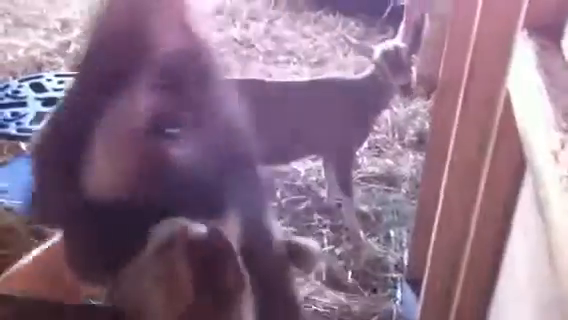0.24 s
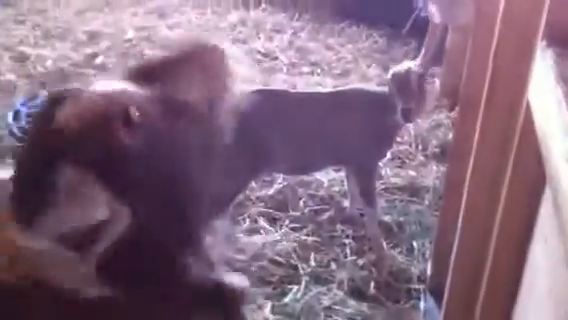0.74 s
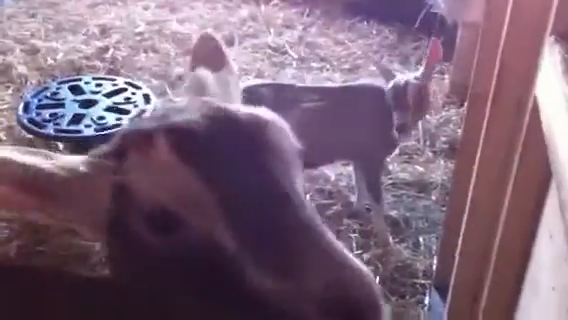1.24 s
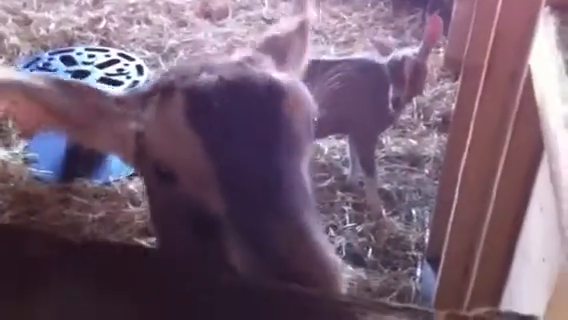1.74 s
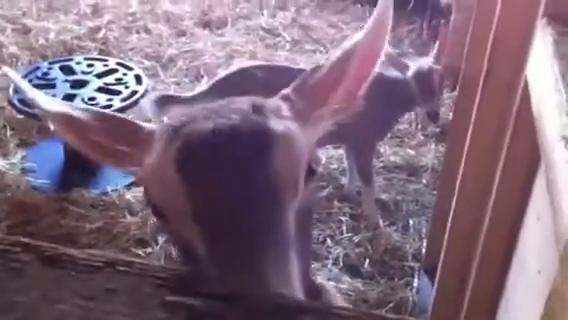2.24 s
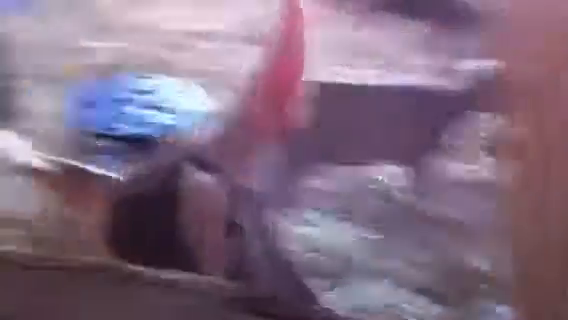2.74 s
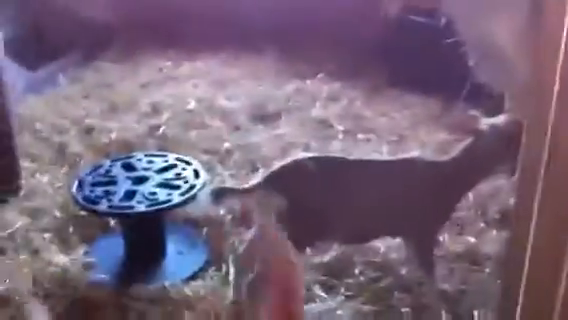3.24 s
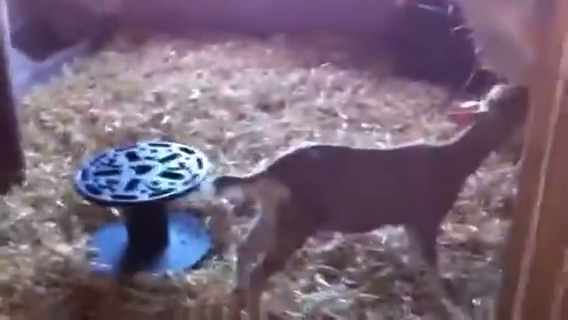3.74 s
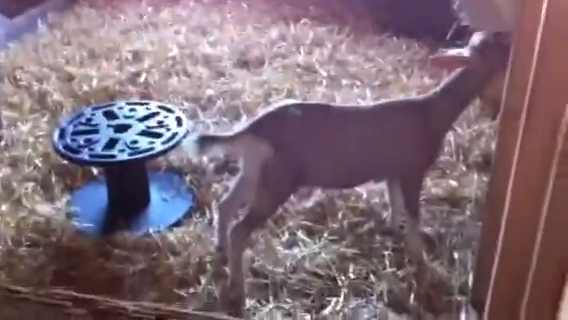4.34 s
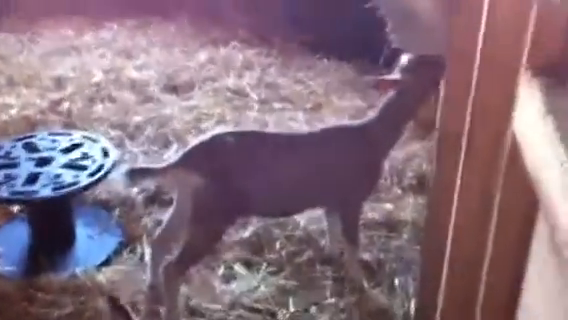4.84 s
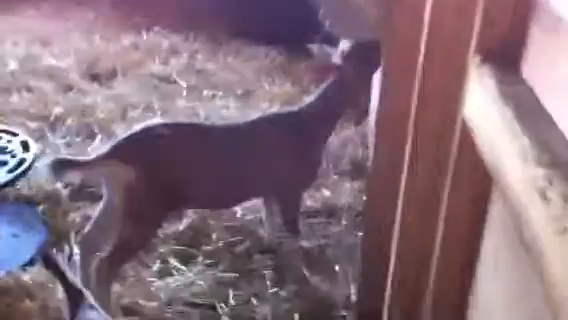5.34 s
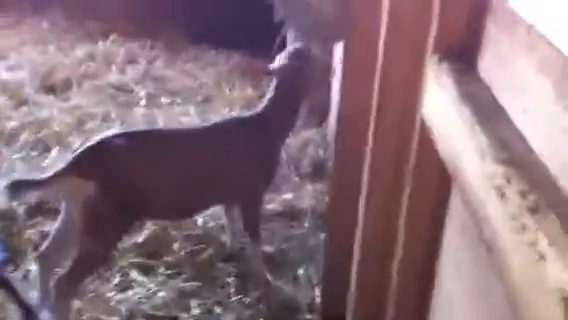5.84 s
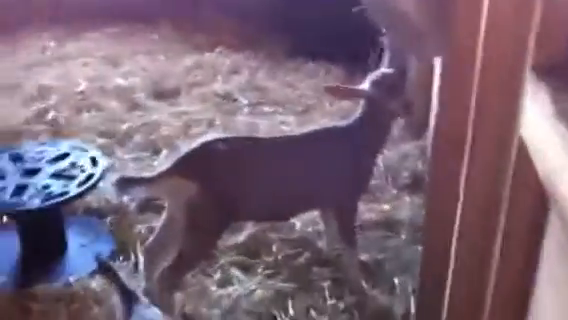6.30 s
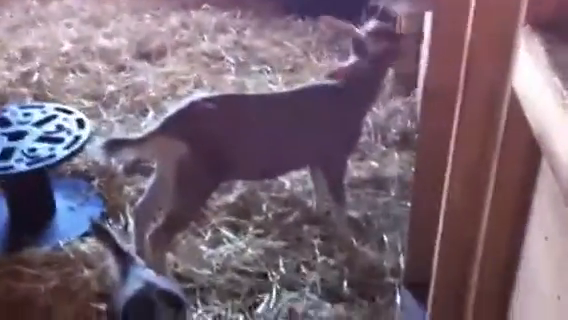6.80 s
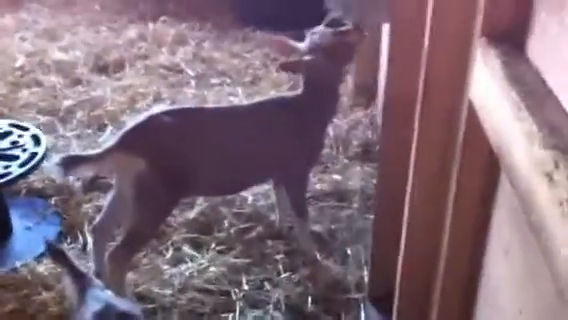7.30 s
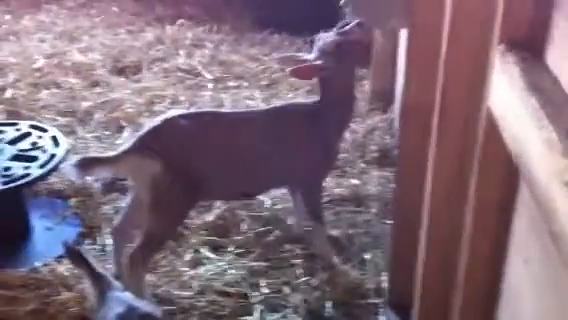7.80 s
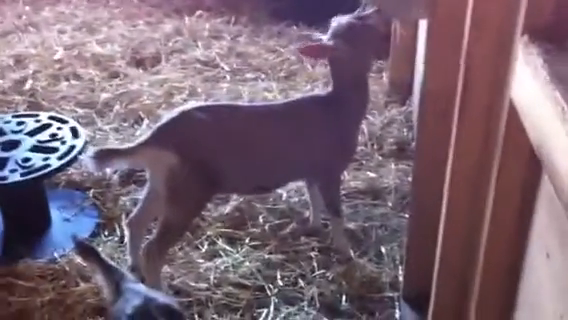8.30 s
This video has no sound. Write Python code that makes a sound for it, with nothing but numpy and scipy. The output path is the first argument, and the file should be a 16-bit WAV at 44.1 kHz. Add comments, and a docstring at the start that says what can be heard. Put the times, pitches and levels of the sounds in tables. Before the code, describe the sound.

Close to a small microphone in a straw-bedded barn pen, coarse hair rasps over a wooden rail in several gritty, hissing strokes, the longest one ringing the wood. A dull knock falls between them. After faint straw rustling, a kid gives one trembling bleat that opens from a hum, then a short, soft, closed-mouth throbbing call. A sharp board knock and a quick jerky wooden scrape end it, with brief hollow room echo.

```python
"""In a straw pen a young goat rubs its head along a wooden rail close by: gritty noise through resonances.
The kid gives one long quavering bleat that opens from a hum, then three soft throbs with its mouth nearly
shut; its voice is a stack of harmonics mixed with puffs of air. Boards knock and straw ticks, as short
bursts of noise, and something scrapes in jerks over the wood. The small barn rings briefly."""
import sys
import numpy as np
from scipy import signal
from scipy.fft import rfft, irfft, next_fast_len
from scipy.io import wavfile
from scipy.ndimage import uniform_filter1d

SR = 44100
rng = np.random.default_rng(int(sys.argv[2]) if len(sys.argv) > 2 else 0)


def put_to_file(sound):
    """Save the sound as 16-bit audio at rate SR, in the file named by the first command-line argument."""
    columns = np.atleast_2d(sound).T  # one column per channel
    safe = np.clip(columns, -1, 1)
    whole_steps = np.round(safe * 32767)
    wavfile.write(sys.argv[1], SR, whole_steps.astype(np.int16))


N = 377496
TIME = np.arange(N) / SR
WAVER_HZ = 8.9  # how fast the rail's resonances and the thin ring waver


def amp(db):
    """Turns decibels into a gain."""
    return 10 ** (np.asarray(db) / 20)


def unit(x):
    """Scales a sound to rms 1."""
    return x / np.sqrt(np.mean(x ** 2) + 1e-20)


def decay(t, t60):
    """Exponential fall by 60 dB in t60 seconds."""
    return np.exp(-np.log(1000) * t / t60)


def read(points, hz, column=1):
    """Reads between the points of a table on a log-frequency axis."""
    table = np.array(points, float)
    return np.interp(np.log(hz + 1), np.log(table[:, 0] + 1), table[:, column])


def shape(x, gain):
    """Filters a sound by a gain that depends on frequency."""
    size = next_fast_len(len(x) + 2048)
    hz = np.fft.rfftfreq(size, 1 / SR)
    return irfft(rfft(x, size) * gain(hz), size)[:len(x)]


def colour(x, points, column=1):
    """Filters a sound by the dB curve of a table, then scales it to rms 1."""
    return unit(shape(x, lambda hz: amp(read(points, hz, column))))


def wander(length, rate_hz):
    """Slow random movement of rms 1: noise with the fast changes filtered out."""
    return unit(shape(rng.standard_normal(length), lambda hz: 1 / (1 + (hz / rate_hz) ** 4)))


def band(length, centre_hz, width_hz):
    """A narrow band of noise at rms 1, like a cluster of close modes."""
    def gain(hz):
        return 1 / (1 + ((hz - centre_hz ** 2 / (hz + 1)) / width_hz) ** 4)
    return unit(shape(rng.standard_normal(length), gain))


def resonate(x, hz, width):
    """A resonance of gain 1 whose frequency follows the curve hz."""
    turn = np.exp(2j * np.pi * np.cumsum(hz * np.ones(len(x))) / SR)
    r = np.exp(-np.pi * width / SR)
    # shift the resonance down to 0 Hz, smooth there, and shift back
    return 2 * (turn * signal.lfilter([1 - r], [1, -r], x / turn)).real


def add(mix, s, sound):
    """Mixes a sound in from time s."""
    part = mix[max(round(s * SR), 0):][:len(sound)]
    part += sound[:len(part)]


def burst(noise, t60, rise=0.00052):
    """Gives a sound a quick rise and an exponential fall."""
    t = np.arange(len(noise)) / SR
    return noise * (1 - np.exp(-t / rise)) * decay(t, t60)


def grains(per_s, spread_db):
    """Friction as tiny slips of uneven size over a fine hiss."""
    sizes = amp(spread_db * np.minimum(rng.exponential(1, N), 4))
    slips = (rng.random(N) < per_s / SR) * rng.standard_normal(N) * sizes
    return unit(slips) + 1.11 * rng.standard_normal(N)


def patchy(x):
    """Shifts the colour at random, in patches narrow in frequency and brief in time."""
    patch_db = 3.5  # typical (rms) depth
    z = signal.stft(x, SR, nperseg=1024)[2]
    patches = uniform_filter1d(rng.standard_normal(z.shape), size=4, axis=0)
    patches = uniform_filter1d(patches, size=9, axis=1)
    return signal.istft(z * amp(patch_db * unit(patches)), SR, nperseg=1024)[1][:len(x)]


def pressure(start, swell_s, ease_s, swell_db, release_db_per_s=163):
    """Gain of one stroke: quick contact, a swell to the crest, a slow easing, then the release."""
    attack_s, ease_db_per_s = 0.016, 44.5
    t = np.maximum(TIME - start, 0)
    db = -swell_db * np.maximum(1 - t / swell_s, 0)
    db -= ease_db_per_s * np.clip(t - swell_s, 0, ease_s)
    db -= release_db_per_s * np.maximum(t - swell_s - ease_s, 0)
    return np.minimum(t / attack_s, 1) * amp(db)


def still_air():
    """Faint steady noise of the air, its level drifting slowly."""
    # spectrum of the air: (frequency [Hz], level [dB])
    air_colour = [(40, -24), (170, 2), (360, 0.5), (700, -6), (16000, -16)]
    return amp(-63.5) * colour(rng.standard_normal(N), air_colour) * amp(1.7 * wander(N, 0.97))


def bedding():
    """Straw slips as grains when shuffled or brushed; ticks and small bumps are short noise bursts."""
    # soft shuffles: (middle [s], level [dB], time from the middle to half gain [s])
    shuffles = [(0, -54, 0.089), (0.4, -59, 0.025), (1.052, -56.5, .12), (6.308, -58.5, 0.056),
                (6.593, -62, 0.11), (7.31, -60, 0.15)]
    # spectrum of the shuffles: (frequency [Hz], level [dB])
    shuffle_colour = [(70, -22), (200, 1.5), (500, -2), (750, -8.5), (2200, -7.5), (4400, -14)]
    # light brushing: (start [s], swell time [s], easing time [s], crest [dB], depth of the swell [dB])
    brushes = [(4.062, 0.013, 0.065, -55.5, 9), (4.377, 0.895, 0.054, -51, 9)]
    # spectrum of the brushing: (frequency [Hz], level [dB])
    brush_colour = [(300, -16), (2200, 0), (3400, -3.5), (5000, -1), (9000, 3), (16000, -4)]
    # ticks and bumps: (time [s], level [dB], t60 [s], centre frequency [Hz])
    ticks = [(2.811, -47, 0.34, 990), (2.96, -38.5, 0.042, 1910), (5.964, -41, 0.012, 1370),
             (6.535, -52, .08, 393), (6.798, -35, 0.036, 11800), (7.46, -49, 0.054, 2200)]
    shuffling = sum(amp(db) / (1 + ((TIME - s) / half) ** 4) for s, db, half in shuffles)
    out = colour(grains(2000, 0.55), shuffle_colour) * shuffling
    brushing = sum(amp(db) * pressure(start, swell_s, ease_s, swell_db)
                   for start, swell_s, ease_s, db, swell_db in brushes)
    out += colour(grains(3000, 0.89), brush_colour) * brushing
    for s, db, t60, centre_hz in ticks:
        snap = shape(rng.standard_normal(SR // 4),
                     lambda hz: 1 / np.hypot(1, hz / centre_hz - centre_hz / (hz + 1)))
        add(out, s, amp(db) * burst(unit(snap), t60))
    return out


def rail(x, pitch, ring_db):
    """The rail's resonances slide down and waver as the point of contact moves; overall level is kept."""
    # resonances before the stroke's factors: (frequency [Hz], width [Hz], level against the rasp [dB])
    resonances = [(1680, 260, -6), (2100, 59, -8.5), (2294, 150, -0.5), (3070, 150, -5), (3350, 89, -3)]
    slide_per_s, slide_centre_s = 0.27, 0.18  # rate of the fall; time when the pitch factor is exact
    waver = 0.036  # share of each resonance's frequency
    t = np.arange(len(x)) / SR
    slide = pitch * np.exp(slide_per_s * (slide_centre_s - t))
    ringing = 0
    for hz, width, db in resonances:
        path_hz = hz * slide * (1 + waver * wander(len(x), WAVER_HZ))
        ringing = ringing + amp(db + ring_db) * resonate(x, path_hz, width)
    return unit(x + ringing) * np.std(x)


def rubbing():
    """Coarse hair slips over the rail: one pressure drives a rasp and a hiss in its resonances and a push."""
    # rubbing strokes: (start [s], swell time [s], easing time [s], crest [dB], depth of the swell [dB],
    # then against the rasp: hiss [dB], fine hiss [dB], push [dB];
    # then the rail's resonances: pitch [factor], strength [dB])
    strokes = [(0.411, 0.14, 0.11, -34, 14, -0.5, -7, -12.5, 0.97, 2),
               (1.471, 0.26, 0.17, -30.5, 7, 2.5, -5, -8.5, 0.98, 7.5),
               (2.705, 0.038, 0.085, -59, 9.5, -2, -1.5, -2, .8, -16),
               (2.84, 0.067, 0.052, -49.5, 16, -13, -32, -5, 0.94, -22),
               (3.078, 0.15, 0.083, -46.5, 13.5, -9.5, -15.5, -5, 0.72, -19),
               (3.362, 0.14, 0.12, -35.5, 6, 2, -0.5, -15.5, 0.974, 2.5)]
    # spectra of the rasp, the dull push and the hiss of the hair: (frequency [Hz], level [dB])
    rasp_colour = [(450, -25), (700, 1), (1150, 3), (1600, 3.5), (2400, 4.5), (2750, -3.5), (3800, -24)]
    push_colour = [(70, -44), (110, -28), (150, -5), (340, 3), (540, -1.5), (1000, -20)]
    hiss_colour = [(2100, -26), (2900, 0.5), (4400, 2.5), (5200, -2), (8500, -2), (12000, -9), (16000, -22)]
    lean_db_per_s = 59  # the push grows as the head leans in
    contact_db, contact_t60_s = 9, 0.29  # extra push for a moment at first contact
    fine_above_hz = 6300
    fine_lead_s, fine_release_db_per_s = 0.0036, 223  # the finest hiss crests and stops first
    rasp = colour(patchy(grains(5000, 2.5)), rasp_colour)
    push = colour(grains(600, 1.0), push_colour)
    hair = colour(patchy(grains(9000, 2.2)), hiss_colour)
    hiss = shape(hair, lambda hz: 1 / (1 + (hz / fine_above_hz) ** 10))
    hiss, fine = unit(hiss), unit(hair - hiss)
    out = np.zeros(N)
    for start, swell_s, ease_s, db, swell_db, hiss_db, fine_db, push_db, pitch, ring_db in strokes:
        first = round(start * SR)
        span = slice(first, first + SR)
        t = np.clip(TIME[span] - start, 0, swell_s + ease_s)
        lean = amp(lean_db_per_s * (t - swell_s)) + amp(contact_db) * decay(t, contact_t60_s)
        body = rail(rasp[span] + amp(hiss_db) * hiss[span], pitch, ring_db)
        body += amp(push_db) * lean * push[span]
        add(out, start, amp(db) * pressure(start, swell_s, ease_s, swell_db)[span] * body)
        fine_press = pressure(start, swell_s - fine_lead_s, ease_s, swell_db, fine_release_db_per_s)
        out += amp(db + fine_db) * fine_press * fine
    return out * amp(0.86 * wander(N, 36))


def knocks():
    """Blows ring a board's crowded, damped modes over a low thud; longer boards are lower, soft blows duller."""
    # blows: (time [s], level [dB], t60 [s], dulled above [Hz], pitch of the board [factor], thud [dB])
    blows = [(0.792, -26, 0.059, 2440, 0.688, -38), (7.537, -20, 0.077, 3250, 0.99, -59)]
    # spectrum of the board before the pitch factor: (frequency [Hz], level [dB])
    board_colour = [(80, -51.5), (300, -17.5), (520, -5), (1000, -3), (1350, 3.5), (1700, 1), (2350, 2),
                    (3000, -4.5), (16000, -19.5)]
    # lasting modes before the pitch factor: (frequency [Hz], level against the blow [dB], t60 [s])
    modes = [(735, -19.5, 0.15), (1280, -19, 0.47), (1370, -19, 0.31), (2080, -5.5, 0.11)]
    mode_width = 0.16  # share of the listed frequency
    # spectrum of the thud: (frequency [Hz], level [dB])
    thud_colour = [(50, -27), (130, -3), (470, 4), (700, -25.5)]
    out = np.zeros(N)
    for s, db, t60, dull_hz, pitch, thud_db in blows:
        wood = shape(rng.standard_normal(SR // 4),
                     lambda hz: amp(read(board_colour, hz / pitch)) / np.hypot(1, (hz / dull_hz) ** 2))
        add(out, s, amp(db) * burst(unit(wood), t60, rise=0.00097))
        thud = colour(rng.standard_normal(SR), thud_colour)
        add(out, s, amp(thud_db) * burst(thud, t60=0.34, rise=0.0014))
        for mode_hz, mode_db, mode_t60 in modes:
            mode = band(SR, mode_hz * pitch, mode_width * mode_hz)
            add(out, s, amp(db + mode_db) * burst(mode, mode_t60))
    return out


def rail_rings():
    """Rings of the wood build and die away late in some strokes; a thin high ring lingers."""
    # rings: (crest [s], level [dB], centre frequency [Hz], width [Hz])
    rings = [(1.81, -36, 315, 130), (1.85, -41, 160.6, 36), (1.885, -35.5, 362, 280),
             (3.261, -52, 165, 39.6), (3.595, -41, 268, 75), (3.68, -46, 3160, 220)]
    # thin ring that outlasts the hardest stroke: (frequency [Hz], level [dB], t60 [s])
    thin_ring = [(3662, -63, 1.42), (4554, -47.5, 1.075)]
    rise_db_per_s, ring_t60_s = 120, 0.38
    thin_ring_s = 1.824  # start time
    out = np.zeros(N)
    for s, db, centre_hz, width_hz in rings:
        rise = amp(-rise_db_per_s * np.maximum(s - TIME, 0))
        fall = decay(np.maximum(TIME - s, 0), ring_t60_s)
        out += amp(db) * rise * fall * band(N, centre_hz, width_hz)
    for hz, db, t60 in thin_ring:
        tone = unit(np.sin(2 * np.pi * hz * TIME[:SR])) * amp(2 * wander(SR, WAVER_HZ))
        add(out, thin_ring_s, amp(db) * burst(tone, t60))
    return out


def bleat(controls, start, end, sag, dip_db, dip_rough, flatness, first_dip):
    """Vocal pulses quaver: between throbs the pitch sags, the level drops and the voice turns hoarse."""
    # throat spectrum: (frequency [Hz], mouth shut [dB], mouth half open [dB], mouth open [dB])
    throat = [(108, -32, -23, -44), (247, 6.5, 8, -23), (494, -13.5, -14, -4.5), (740, -16, 3.5, 1),
              (1080, -17.5, -3, -6), (1340, -19, -11, -14), (1750, -21, -15.5, -9), (2180, -25, -21, -11.5),
              (2800, -25.5, -16.5, -15), (3700, -31, -36, -17.5), (4240, -23.5, -18.5, -9),
              (7300, -26.5, -19, -16.5), (8550, -38, -26, -54)]
    mouth_db, mouth_width_hz = 4.5, 120  # the moving resonance, against the plain throat
    smear_rad = 1.3  # random spread of the harmonics' phases, which softens each vocal pulse
    hoarse_sag, hoarse_jitter = 0.16, 0.0594  # shares of the pitch: deeper sag, trembling
    t = np.arange(start, end, 1 / SR)
    s, *columns = np.transpose(controls)
    hz, db, mouth, quaver, mouth_hz, hoarse = (np.interp(t, s, c) for c in columns)

    beat = np.cumsum(quaver) / SR
    swing = abs(np.sin(np.pi * (beat - np.interp(s[0], t, beat))))  # 0 on a throb, 1 between two
    dip = swing ** flatness * np.where(t < s[0], first_dip, 1)
    jitter = (0.02 * dip + hoarse_jitter * hoarse) * wander(len(t), 150)
    sagging = 1 - (sag + hoarse_sag * hoarse) * swing ** 2
    turns = np.cumsum(hz * sagging * (1 + jitter)) / SR  # cycles of the vocal folds so far

    folds = sum(np.cos(2 * np.pi * k * turns + smear_rad * rng.standard_normal()) for k in range(1, 42))
    # hoarse pulses alternate strong and weak, which puts partials between the harmonics
    folds = folds * (1 + hoarse * (1 + dip) * wander(len(t), 40) * np.cos(np.pi * turns))
    # air rushes through once a cycle; it masks the upper harmonics and leaves the lowest clean
    puffs = rng.standard_normal(len(t)) * (1 + 0.26 * np.cos(2 * np.pi * turns))
    puffs = shape(puffs, lambda f: f / np.hypot(f, 1200))
    rough = np.clip(hoarse + dip_rough * dip, 0, 1)
    drive = (1 - rough) * unit(folds) + 1.5 * rough * unit(puffs)

    voice = np.zeros(len(t))
    for k in range(3):  # blend the throat from shut through half open to open
        share = np.maximum(1 - abs(np.clip(mouth, 0, 2) - k), 0)
        voice += share * colour(drive, throat, k + 1)
    voice = unit(voice + amp(mouth_db) * resonate(voice, mouth_hz, mouth_width_hz))
    fade = np.clip(np.minimum(t - start, end - t) / 0.01, 0, 1)
    return voice * amp(db - dip_db * dip) * fade


def kid():
    """The long bleat, then the short one, each steered by a table of controls for the throat."""
    # controls over each bleat: (time [s], pitch on a throb [Hz], level on a throb [dB],
    # mouth [0 shut, 1 half, 2 open], throbs [per s], moving resonance [Hz], hoarseness [0-1])
    long_controls = [(4.722, 298.7, -43.5, 0.24, 11.8, 1470, 0.15),
                     (4.815, 354, -39, 0.48, 9.8, 1460, 0.08), (5.02, 350.5, -37, 0.37, 9.5, 1500, 0.09),
                     (5.115, 365.4, -36.5, 1.25, 11.86, 1500, .05),
                     (5.288, 378, -39, 0.99, 12.04, 1660, .05),
                     (5.368, 358.6, -35.5, 1.73, 12.2, 1784, .15), (5.478, 350, -34, 1.8, 6.67, 1680, .14),
                     (5.62, 285.7, -40.5, 1.4, 6.93, 1460, 0.4)]
    short_controls = [(6.943, 253.6, -41.5, .12, 9.8, 1480, .14), (7.058, 300, -40.5, 0.16, 8, 1540, 0.073),
                      (7.17, 278.2, -37.5, 0.12, 9.4, 1130, .1)]
    # when each bleat sounds: (start [s], end [s])
    long_span, short_span = [(4.665, 5.68), (6.885, 7.208)]
    out = np.zeros(N)
    add(out, long_span[0], bleat(long_controls, *long_span, sag=0.12, dip_db=13, dip_rough=0.1,
                                 flatness=2.1, first_dip=0.44))
    add(out, short_span[0], bleat(short_controls, *short_span, sag=0.14, dip_db=16.0, dip_rough=0.23,
                                  flatness=1.5, first_dip=0.56))
    return out


def scrape():
    """Each jerk is a noise burst that mixes the hollow sound of wood with a high gritty squeal."""
    # jerks: (time [s], level [dB], t60 [s], share of wood against squeal [0-1])
    jerks = [(7.846, -41, 1, 0.37), (7.896, -27, 0.067, 0.15), (7.956, -34, 0.29, 0.86),
             (7.976, -34, 0.24, 1), (7.991, -24.5, 0.049, 0.76), (8.021, -36, 0.15, 1),
             (8.045, -25.5, 0.095, 0.57), (8.071, -22.5, 0.094, 0.95)]
    # spectra of the scrape: (frequency [Hz], wood [dB], squeal [dB])
    scrape_colour = [(101.4, -31, -13), (440, -8, 6), (544, 7.5, 0), (660, -21.5, 9), (1060, 1, -12),
                     (1440, 3, -5), (2630, -8, -4.5), (7900, -13.5, -5.5), (8900, -31, 5.5),
                     (12400, -14, 1), (16000, -24, -12)]
    out = np.zeros(N)
    for s, db, t60, share in jerks:
        grit = rng.standard_normal(SR // 3)
        share = np.clip(share, 0, 1)
        wood = colour(grit, scrape_colour, column=1)
        squeal = colour(grit, scrape_colour, column=2)
        jerk = share * wood + (1 - share) * squeal
        add(out, s, amp(db) * burst(unit(jerk), t60, rise=0.0006))
    return out


def barn(x):
    """Echoes as sparse reflections of random sign, the treble dying first."""
    # how long the echo lasts: (frequency [Hz], t60 [s])
    echo_t60 = [(150, 0.65), (1400, 0.54), (4000, 0.38), (15000, 0.38)]
    boom_hz, boom_width_hz, boom_db = 553, 150, -4  # the echo favours one hollow note
    t = np.arange(SR) / SR
    taps = rng.choice([-1., 1.], SR) * (rng.random(SR) < 3000 / SR) * (t > 0.004)
    hz, when, z = signal.stft(taps, SR, nperseg=256)
    tail = signal.istft(z * decay(when, read(echo_t60, hz)[:, None]), SR, nperseg=256)[1]
    tail = tail + amp(boom_db) * resonate(tail, boom_hz, boom_width_hz)
    return signal.fftconvolve(x, tail / np.linalg.norm(tail))[:N]


def scene():
    """All sources, each with its share of the barn's echo, over still air."""
    voice_wet_db, rub_wet_db, straw_wet_db, wood_wet_db = -3, -4.5, -23, -10
    air, straw = still_air(), bedding()
    rub = rubbing() + rail_rings()
    wood = knocks() + scrape()
    voice = kid()
    wet = barn(amp(voice_wet_db) * voice + amp(rub_wet_db) * rub
               + amp(straw_wet_db) * straw + amp(wood_wet_db) * wood)
    return (voice + rub + straw + wood + wet + air)[None]


def record(dry):
    """The small microphone loses the deep bass; then a steep filter cuts the highest treble."""
    edge_hz = 15950
    thin = signal.sosfilt(signal.butter(1, 80, "highpass", fs=SR, output="sos"), dry)
    lowpass = signal.firwin(511, edge_hz, window=("kaiser", 9), fs=SR)
    return signal.oaconvolve(thin, lowpass[None], "same")


dry = scene()
out = record(dry)
put_to_file(out)
```